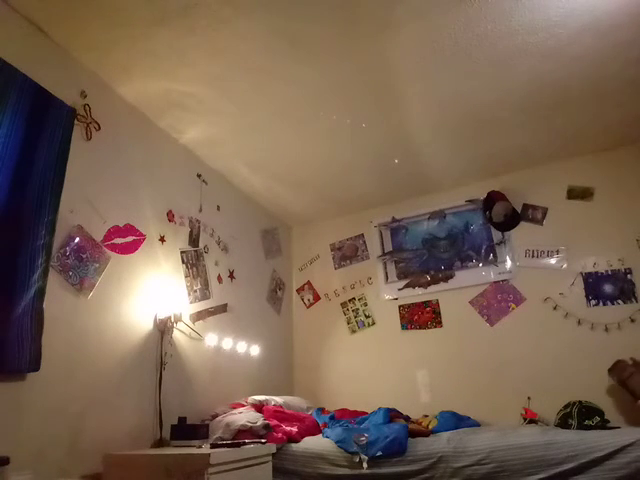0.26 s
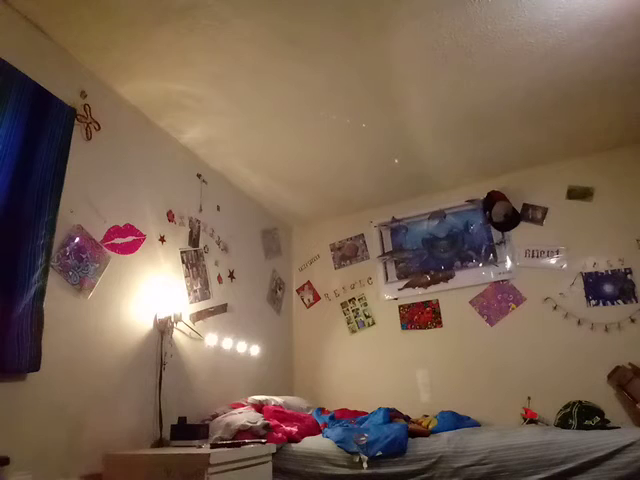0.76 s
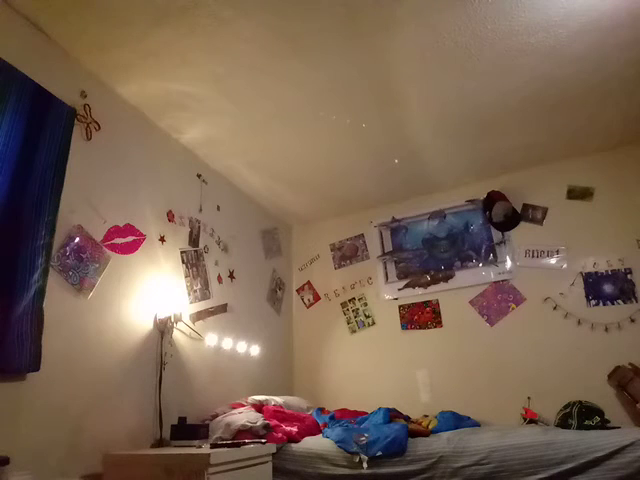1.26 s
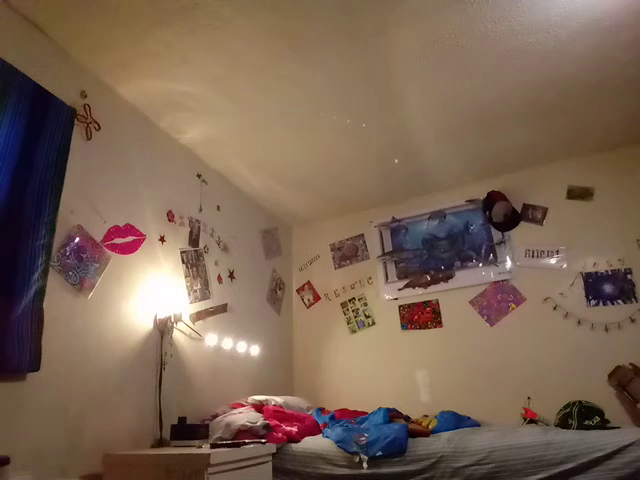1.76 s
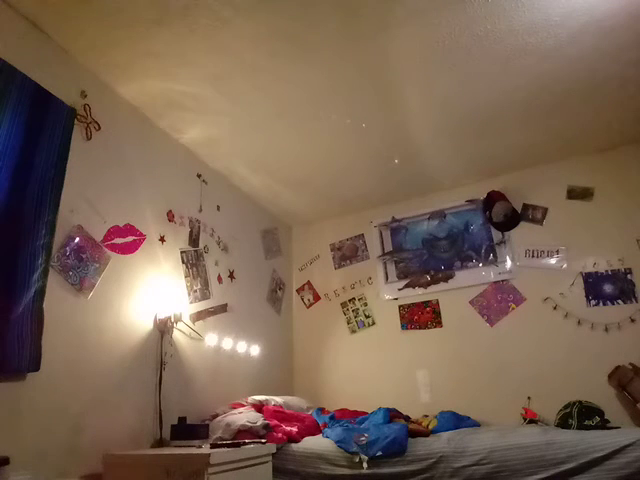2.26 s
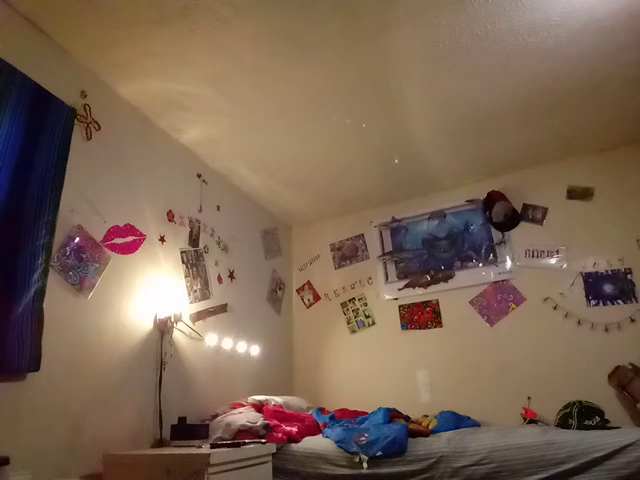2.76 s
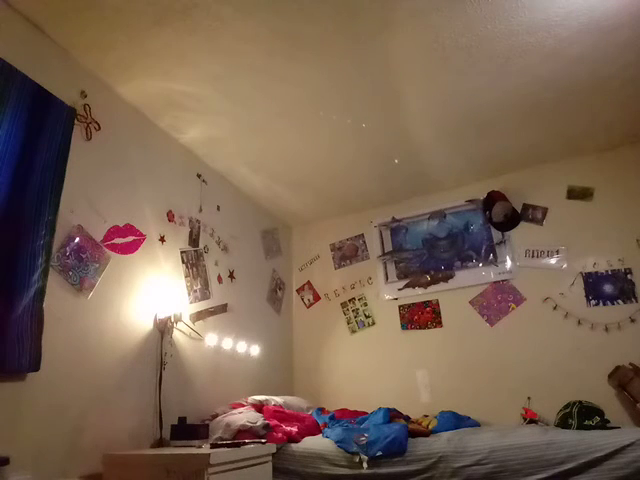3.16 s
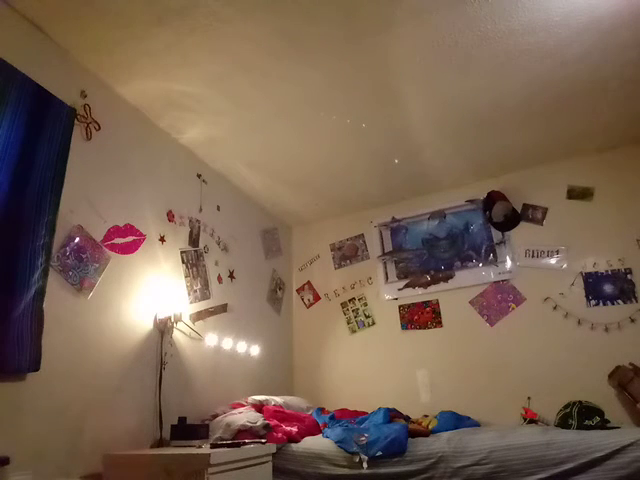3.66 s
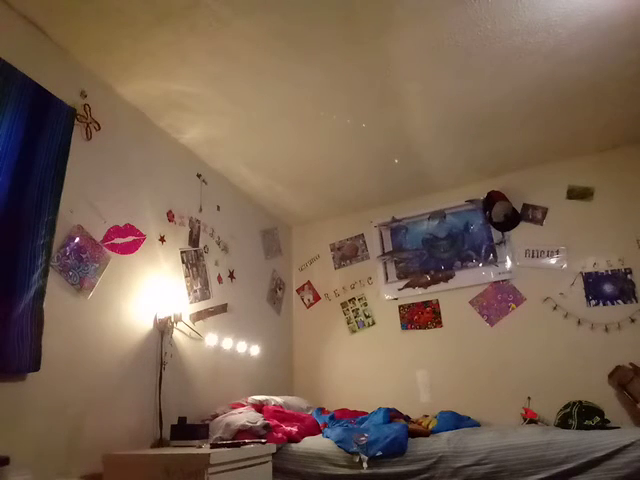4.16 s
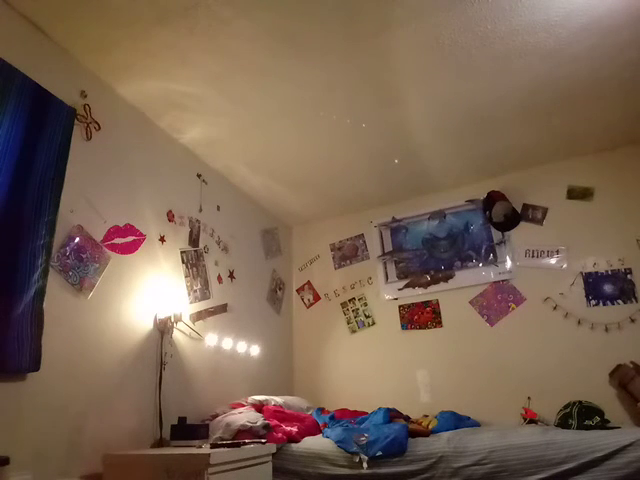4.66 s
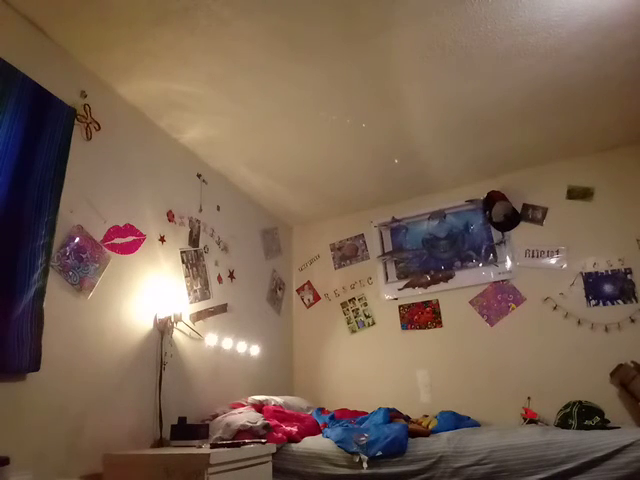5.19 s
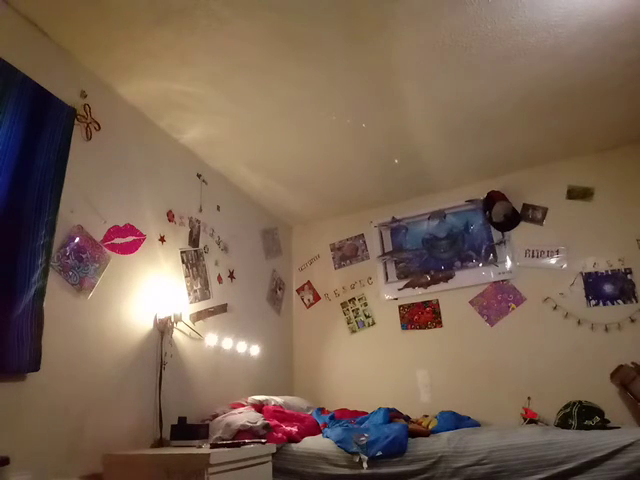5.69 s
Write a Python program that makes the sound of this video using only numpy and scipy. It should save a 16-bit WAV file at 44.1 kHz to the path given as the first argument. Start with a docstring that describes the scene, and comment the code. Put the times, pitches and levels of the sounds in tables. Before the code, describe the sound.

Someone out of sight shifts objects in a small bedroom: hollow wooden knocks, hard clacks, thuds, short scrapes and faint squeaks over quiet hiss.

```python
"""Shifting things in a small bedroom

Someone out of sight sets objects down: hollow wooden knocks, hard clacks, heavy thuds and dull floor bumps,
with short slides, faint squeaks and tiny touches between them. A blow is a burst of random touches spread by
the room, plus decaying sine modes, levelled in six registers. Slides are filtered stick-slip grains, squeaks
are unsteady tones. A small microphone colours them, over room tone, a low hum, floor rumble and hiss.
"""
import sys
import numpy as np
from scipy import signal
from scipy.fft import rfft, irfft, next_fast_len
from scipy.io import wavfile

SR = 44100
rng = np.random.default_rng(int(sys.argv[2]) if len(sys.argv) > 2 else 0)


def materialize(psi):
    """Save the field psi as 16-bit PCM at rate SR to the path in sys.argv[1].

    A 1-D psi becomes a single channel; in a 2-D psi each row is a channel.
    """
    bounded = np.clip(np.atleast_2d(psi).T, -1, 1)
    quanta = np.round(bounded * 32767).astype(np.int16)
    wavfile.write(sys.argv[1], SR, quanta)


N = 261557
TIME = np.arange(N) / SR


def undb(db):
    """Decibels to gain."""
    return 10 ** (np.asarray(db) / 20)


def unit(x):
    """Scale to an rms of one."""
    return x / np.sqrt(np.mean(x ** 2) + 1e-20)


def read(points, hz):
    """Read a (hz, value) table on a log-frequency axis."""
    table_hz, value = np.transpose(points)
    return np.interp(np.log(np.maximum(hz, 1)), np.log(table_hz), value)


def colour(x, points):
    """Shape a sound by a (hz, gain_db) spectrum."""
    size = next_fast_len(len(x) + 4096)
    gain = undb(read(points, np.fft.rfftfreq(size, 1 / SR)))
    return irfft(rfft(x, size) * gain, size)[:len(x)]


def band(x, low_hz, high_hz, order=3):
    """Causal Butterworth band-pass."""
    edges_hz = [low_hz, min(high_hz, .45 * SR)]
    return signal.sosfilt(signal.butter(order, edges_hz, "band", fs=SR, output="sos"), x)


def walk(rate_hz):
    """Random wander: normal knots at rate_hz, joined by straight lines."""
    knots = rng.standard_normal(400)
    return np.interp(TIME * rate_hz, np.arange(len(knots)), knots)


def add(out, start_s, sound):
    """Mix a sound in at a time; negative times start at zero."""
    i = max(int(start_s * SR), 0)
    out[i:i + len(sound)] += sound[:max(N - i, 0)]


# reverberation time of the bedroom: hz, t60_s
ROOM_T60 = [(80, 0.17), (260, 0.4), (700, 0.25), (1800, 0.24), (4800, 0.15), (12000, 0.067)]


def bedroom(direct_db, late_db=-31, late_t60_s=1.52, mixing_s=.04, sparsest=0.03):
    """Room response: direct sound, single reflections that crowd together, and a faint longer tail."""
    t = TIME[:int(.7 * SR)]
    edges_hz = 40 * 2 ** np.arange(10)
    # reflections multiply with the square of time
    density = np.clip((t / mixing_s) ** 2, sparsest, 1)
    present = rng.random(len(t)) < density
    echoes = rng.standard_normal(len(t)) * present / np.sqrt(density)
    tail = 0
    for low_hz, high_hz in zip(edges_hz, edges_hz[1:]):
        t60_s = read(ROOM_T60, np.sqrt(low_hz * high_hz))
        fade = undb(-60 * t / t60_s) + undb(late_db - 60 * t / late_t60_s)
        tail = tail + band(echoes, low_hz, high_hz, order=1) * fade
    response = tail / np.sqrt(np.sum(tail ** 2))
    response[0] += undb(direct_db)
    return response


def contact(contact_ms, t, lead_s, graze_db, rise_share=0.64):
    """Light graze, then a chatter of tiny touches that builds as surfaces meet and dies; unit energy."""
    age = np.maximum(t - lead_s, 0) * 1000 / max(contact_ms, 1)  # in contact lengths
    graze = undb(graze_db) * np.minimum(t / lead_s, 1) ** 2
    force = (1 - np.exp(-age / rise_share) + graze) * np.exp(-age)
    chatter = rng.standard_normal(len(t)) ** 3 * force
    return chatter / np.sqrt(np.sum(chatter ** 2))


def ringing(modes, age_s, contact_ms, scatter_db, detune):
    """Decaying sine modes; every landing favours other modes and shifts them a little."""
    ring = 0
    for hz, level_db, t60_s in modes:
        favour, shift, phase_rad_over_2pi = rng.standard_normal(3)
        fade = undb(level_db + scatter_db * favour - 60 * age_s / t60_s)
        ring = ring + fade * np.sin(2 * np.pi * (hz * (1 + detune * shift) * age_s + phase_rad_over_2pi))
    return ring * (1 - np.exp(-age_s * 2000 / max(contact_ms, 1)))


# registers of a blow, thump to tick: low_hz, high_hz
REGISTERS = [(52, 135), (150, 450), (450, 1700), (1700, 3300), (3300, 5600), (5600, 15000)]


def landings(events, thump_db, treble_db):
    """Register levels of a blow: weight lifts body and thump, brightness tilts clack, snap and tick."""
    centres_hz = np.sqrt(np.prod(REGISTERS, axis=1))
    octaves = np.log2(centres_hz[3:] / centres_hz[2])
    landed = []
    for start_s, contact_ms, level_db, weight_db, bright_db_per_oct in events:
        body_db = level_db + weight_db
        upper_db = level_db + bright_db_per_oct * octaves + treble_db
        landed.append((start_s, contact_ms, body_db + thump_db, body_db, level_db, *upper_db))
    return landed


def blows(events, modes, tone, ring_db, graze_db, direct_db, thump_lag_s, scatter_db=2, detune=0.0011):
    """Each contact excites object modes and the room; register levels are set over the attack."""
    out, t = np.zeros(N), TIME[:int(.7 * SR)]
    lead_s, attack = .007, int(.03 * SR)
    age_s = np.maximum(t - lead_s, 0)
    # two corners touch down, each with its own paths to the microphone
    corners = [bedroom(direct_db) for _ in range(2)]
    sounds = []
    for _, contact_ms, *_ in events:
        crack = 0
        for paths in corners:
            touch = contact(contact_ms, t[:3 * attack], lead_s, graze_db)
            crack = crack + signal.fftconvolve(touch, paths)[:len(t)]
        ring = ringing(modes, age_s, contact_ms, scatter_db, detune)
        sounds.append(unit(colour(crack, tone)) + undb(ring_db) * unit(ring))
    for k, (low_hz, high_hz) in enumerate(REGISTERS):
        # the floor takes a moment to move: thump lags and builds
        lag_s, build = (thump_lag_s, attack // 3) if k == 0 else (0, 0)
        parts = band(np.array(sounds), low_hz, high_hz)
        for (start_s, _, *levels_db), part in zip(events, parts):
            loud = part[int(lead_s * SR) + build:][:attack]
            add(out, start_s - lead_s + lag_s, undb(levels_db[k]) * part / np.std(loud))
    return out


# room tone: hz, gain_db
ROOM_TONE = [(25, -28.5), (45, -5), (62, -9), (90, 1), (130, 1.5), (240, -1.5), (400, -13.5), (1000, -17.5),
             (2500, -20), (6000, -36)]
# microphone hiss: hz, gain_db
HISS = [(500, 0), (3000, -8.5), (4900, 2), (5800, -16.5), (6400, -12.5), (7300, -22), (7850, -8),
        (8100, 4.5), (8450, -10.5), (9300, -6.5), (10500, -29), (14000, -23), (15200, -8)]
# weight shifting on the floor: middle_s, length_s, level_db
SHIFTS = [(0.65, 0.6, -57), (1.38, 0.1, -59), (1.72, 0.24, -54), (2.25, 0.17, -67), (3.723, 0.64, -65),
          (4.75, 1, -61.5)]


def background(tone_db=-64, hum_hz=240, hum_db=-69, hiss_db=-65.5, rest_db=-76):
    """Room tone, wavering mains hum, floor rumble swelling with each weight shift, microphone hiss."""
    tone = unit(colour(rng.standard_normal(N), ROOM_TONE)) * undb(tone_db + 0.4 * walk(5.7))
    hum = np.sin(2 * np.pi * hum_hz * TIME) * undb(hum_db + 2 * walk(6.7))
    load = undb(rest_db)
    for middle_s, length_s, level_db in SHIFTS:
        load = load + undb(level_db) * np.exp(-(2 * (TIME - middle_s) / length_s) ** 2)
    rumble = unit(band(rng.standard_normal(N), 70, 286, order=2)) * load * undb(2 * walk(17))
    hiss = undb(hiss_db) * unit(colour(rng.standard_normal(N), HISS))
    return tone + hum + rumble + hiss


def fidgets(count=110, softest_db=-61, span_db=6, t60_s=0.04, low_hz=900, high_hz=5000, within_s=.4):
    """Tiny touches of fingers and loose parts around the clacks: brief, faint rings at random pitches."""
    out, t = np.zeros(N), TIME[:SR // 10]
    for which, when, pitch, size in rng.random((count, 4)):
        start_s = CLACKS[int(which * len(CLACKS))][0] + within_s * (2 * when - 1)
        hz = low_hz * (high_hz / low_hz) ** pitch
        fade = undb(softest_db + span_db * size - 60 * t / t60_s)
        add(out, start_s, fade * np.sin(2 * np.pi * hz * t))
    return signal.fftconvolve(out, bedroom(-4.5))[:N]


# hollow wooden thing: start_s, contact_ms, level_db, bass_weight_db, brightness_db_per_octave
KNOCKS = [(0.04, 11, -16.5, -14.5, -5.5), (0.117, 13, -23.5, -3, -8.5), (0.158, 2.9, -31.5, -26, -4),
          (0.298, 7.5, -35, 4, -15), (0.349, 3, -35, -26, -7.5), (0.425, 3.2, -35, -0.5, -8.5),
          (0.446, 3.2, -29, -1.5, -14.5), (0.848, 4.1, -48, -0.5, -9), (0.964, 1.5, -59.5, -1, -3.5),
          (1.458, 8.7, -60.5, -18, -2.5), (2.198, 12, -51.5, -14, -9), (2.673, 24.4, -43, -7, -5),
          (4.866, 1.8, -36.5, 0, -9.5), (4.911, 1.9, -40, 3.5, -14.5), (5.41, 6.8, -34.5, -1.5, -9.5),
          (5.448, 9.5, -41.5, -6, -6)]
# its modes: hz, level_db, t60_s
HOLLOW_MODES = [(172.5, 0.5, 0.3), (768, 5, 0.11), (942, -1, 0.3), (1097, 19.5, 0.034), (1203, 1.5, 0.21),
                (1397, -6.5, 0.047), (1437, 6, 0.062), (1727, -11.5, 0.14), (2680, 2, 0.039)]
# its broad colour: hz, gain_db
HOLLOW_TONE = [(50, -21.5), (110, -3), (180, 1.5), (280, -7), (550, -6), (800, 4.5), (1250, -2.5),
               (1550, -2), (1900, -9), (2600, -16), (5000, -13.5)]


def knocks():
    """Hollow wood: strong modes under the crack, a light graze before it."""
    events = landings(KNOCKS, thump_db=-7, treble_db=[0, -.5, 2.5])
    return blows(events, HOLLOW_MODES, HOLLOW_TONE,
                 ring_db=-2, graze_db=-20, direct_db=0, thump_lag_s=0.00858)


# blows on the furniture: start_s, contact_ms, level_db, bass_weight_db, brightness_db_per_octave
THUDS = [(0.168, 14, -32.5, -3.5, -23), (1.188, 10.3, -41, 5, -8.5), (1.598, 2, -64, 21, -7),
         (1.81, 22, -66.5, 17, -4), (3.497, 5.9, -50, 16, -14), (4.51, 3.1, -24.5, -3, -7.5),
         (4.535, 2.6, -35, 3, -9), (4.925, 9.6, -40, -1, -12), (5.295, 5.5, -22.5, 4, -7),
         (5.311, 3.3, -45, 24.5, -0.5), (5.345, 3.6, -54, 15, -5)]
# furniture modes: hz, level_db, t60_s
FURNITURE_MODES = [(62, -8, 0.1), (110.2, -7.5, 0.32), (164, 1.5, 0.16), (191, 7, 0.14), (225.5, 0, 0.092),
                   (332.8, -2, 0.26), (374, -14, 0.13), (451, -11.5, 0.33), (687, -3, 0.23),
                   (860, -17, 0.35), (933, -8, 0.16), (1820, -5, 0.054)]
# furniture broad colour: hz, gain_db
FURNITURE_TONE = [(50, 7), (80, -17), (120, 2), (205, 2.5), (310, -2), (480, -8.5), (720, -6), (1200, -10),
                  (1800, -16), (3000, -26.5), (5000, -26.5)]


def thuds():
    """Objects landing on furniture: low modes and a dark crack."""
    events = landings(THUDS, thump_db=-19, treble_db=[4, -.5, -1])
    return blows(events, FURNITURE_MODES, FURNITURE_TONE,
                 ring_db=-3.0, graze_db=-6.0, direct_db=2.5, thump_lag_s=0.0021)


# things slid along: start_s, length_s, rub_db, grit_db, swell_db (start to end)
SLIDES = [(0.195, 0.23, -48.5, -86, 21), (0.413, 0.1, -44, -68, 26), (2.046, .27, -62, -70.5, -7),
          (2.86, 0.34, -60, -62.5, -6), (3.637, 0.26, -65, -73, 8), (4.153, 0.23, -62.5, -73, -7),
          (4.402, 0.095, -45, -69, 1), (5.075, .21, -47, -76, 0.5)]
# resonances of the sliding thing: hz, width_hz, level_db
SLIDE_MODES = [(826, 450, 3.5), (1106, 55, 0.5), (1250, 82, 1), (1750, 230, -8.5)]


def slides(catch_db=3, arch=1.2, grit_hz=2000, grit_top_hz=5200):
    """Stick-slip grains, in uneven runs, ring the sliding thing and rasp above it; the room carries them."""
    rub, grit = np.zeros(N), np.zeros(N)
    for start_s, length_s, rub_db, grit_db, swell_db in SLIDES:
        # one arch of speed per push, while the pressure changes
        progress = np.clip((TIME - start_s) / length_s, 0, 1)
        push = np.abs(np.sin(np.pi * progress)) ** arch * undb(swell_db * (progress - .5))
        rub += push * undb(rub_db)
        grit += push * undb(grit_db)
    slips = rng.standard_normal(N) ** 3 * undb(catch_db * walk(45))
    body = 0
    for hz, width_hz, level_db in SLIDE_MODES:
        body = body + undb(level_db) * band(slips, hz - width_hz / 2, hz + width_hz / 2, order=1)
    rasp = band(slips, grit_hz, grit_top_hz, order=2)
    return signal.fftconvolve(rub * unit(body) + grit * unit(rasp), bedroom(0.81))[:N]


# hard light thing: start_s, contact_ms, level_db, bass_weight_db, brightness_db_per_octave
CLACKS = [(0.233, 2, -42, -10, -1), (0.496, 3, -22.5, -14, -4.5), (1.136, 16.5, -39.5, -5, -0.5),
          (1.52, 5.3, -67.5, 7, 5), (2.5, 30, -72.5, -3, 3.5), (2.75, 9.7, -57, 3.5, 1),
          (2.946, 9.3, -70, -8, 6), (3.025, 4, -53, -15, 0), (3.06, 13, -52, -4.5, -1),
          (3.11, 4, -62, 6.5, 1.5), (3.315, 5, -40.5, -4.5, 0), (3.34, 2.4, -41.5, -5.5, 0),
          (3.426, 8.4, -27.5, -3, -0.9), (3.463, 3, -28.5, -4, -3), (4.051, 14, -49, -6, 1.15),
          (4.115, 2.5, -53, 0, 0), (4.41, 7.3, -59.5, 9.5, 3.5), (4.447, 4.1, -40, 1.5, -2.5),
          (4.818, 2.3, -43.5, -19, -4)]
# its modes: hz, level_db, t60_s
HARD_MODES = [(371, -0.5, 0.58), (1010, 4, 0.14), (1195, 6, 0.3), (1456, 7, 0.44), (1794, 18.5, 0.07),
              (2057, 11.5, 0.39), (2397, 21, .2), (2660, -15, 0.096), (2810, 9, 0.3), (4150, -4, 0.081),
              (4700, 2, 0.12)]
# its broad colour: hz, gain_db
HARD_TONE = [(50, 7), (120, 3.5), (370, -4.5), (500, -2.5), (750, 6.5), (1400, 4), (1950, 9.5), (2650, 6.5),
             (3600, -8.5), (5000, -8.5)]


def clacks():
    """Hard light object: crack well above the ring, with a strong graze before it."""
    events = landings(CLACKS, thump_db=-9, treble_db=[3, 1, -3])
    return blows(events, HARD_MODES, HARD_TONE,
                 ring_db=-11.5, graze_db=-3.5, direct_db=-1.0, thump_lag_s=0.0116)


# squeaks of a hinge or a sliding edge, and at 3.3 s a soft knock with a 700 Hz body just before a clack:
# start_s, pitch_hz, level_db, length_s
SQUEAKS = [(0.965, 1222, -56.5, 0.011), (1.446, 4800, -57.5, 0.013), (2.195, 1166, -65, .025),
           (2.215, 737, -59.5, 0.022), (2.947, 3740, -63, 0.053), (2.947, 1327, -53.5, 0.021),
           (3.045, 944, -59.5, 0.16), (3.147, 1780, -61, 0.066), (3.3, 705, -45, 0.054),
           (3.659, 1436, -63, 0.19), (3.666, 2480, -55.5, 0.014), (3.745, 3610, -64, 0.025),
           (3.756, 786, -59.5, 0.073), (5.115, 1098, -47.5, 0.068), (5.180, 877, -42.5, 0.07)]


def squeaks(waver=0.03, glide=0.047, flutter_db=5):
    """Dry rubbing catches on one unsteady, slightly rising tone, which the room blurs."""
    out, room = np.zeros(N), bedroom(0)
    for start_s, pitch_hz, level_db, length_s in SQUEAKS:
        progress = np.linspace(0, 1, int(length_s * SR))
        n = len(progress)
        hz = pitch_hz * (1 + glide * (progress - .5) + waver * walk(300)[:n])
        grip = undb(flutter_db * walk(150)[:n]) * signal.windows.tukey(n, .4)
        tone = signal.fftconvolve(grip * np.sin(2 * np.pi * np.cumsum(hz) / SR), room)
        add(out, start_s, undb(level_db) * tone / np.std(tone[:n]))
    return out


# floor taking a load: start_s, contact_ms, level_db
BUMPS = [(1.19, 14, -41), (1.602, 2.1, -40), (1.652, 6.4, -45), (1.7, 5, -49), (3.474, 5.3, -39.5),
         (3.499, 17, -33), (3.533, 8.4, -36), (3.559, 6, -52), (4.206, 30, -53)]
# relative level of a bump in each register, thump to tick: level_db
BUMP_DB = [2.5, -21, -20.5, -29, -34.5, -33]


def bumps():
    """Dull floor bumps: furniture modes and colour, weighted to the thump register."""
    events = [(start_s, contact_ms, *np.add(level_db, BUMP_DB)) for start_s, contact_ms, level_db in BUMPS]
    return blows(events, FURNITURE_MODES, FURNITURE_TONE,
                 ring_db=3.5, graze_db=-16.0, direct_db=4.5, thump_lag_s=0)


# microphone colour: hz, gain_db
MIC = [(30, -2), (100, -6), (3000, -2.5), (5000, -0.5), (5700, -18.5), (6400, -11.5), (7300, -21),
       (8300, -11.5), (9300, -14.5), (11000, -23), (15500, -21)]


def scene():
    """All the handling, coloured by the small microphone, over the background."""
    handling = fidgets() + knocks() + thuds() + slides() + clacks() + squeaks() + bumps()
    return (colour(handling, MIC) + background())[None]


def record(dry, top_hz=15900):
    """The recorder cuts the top: steep elliptic low-pass."""
    return signal.sosfilt(signal.ellip(10, .2, 70, top_hz, fs=SR, output="sos"), dry)


dry = scene()
out = record(dry)
materialize(out)
```